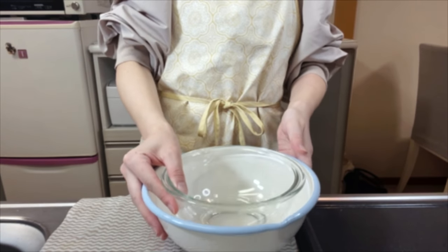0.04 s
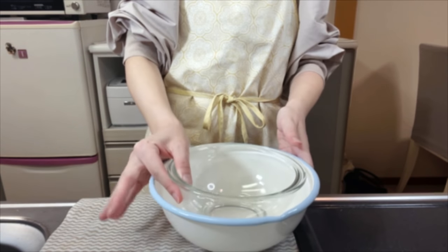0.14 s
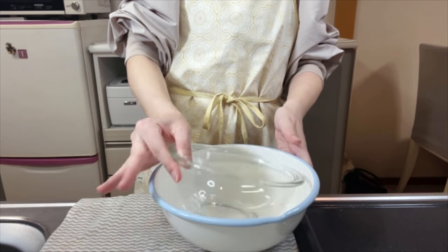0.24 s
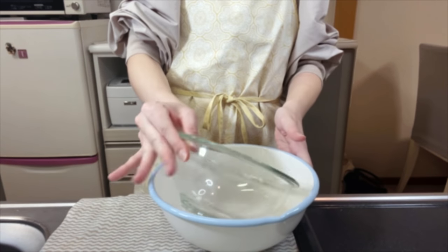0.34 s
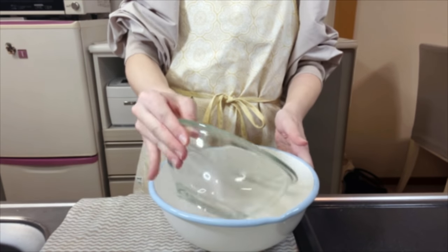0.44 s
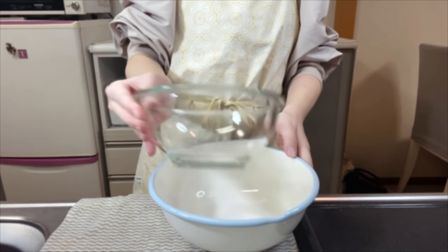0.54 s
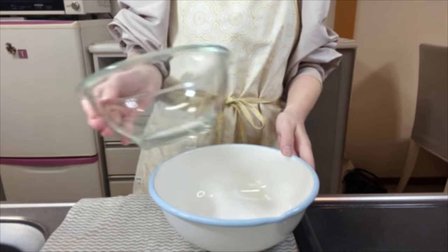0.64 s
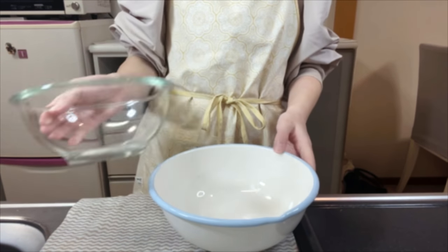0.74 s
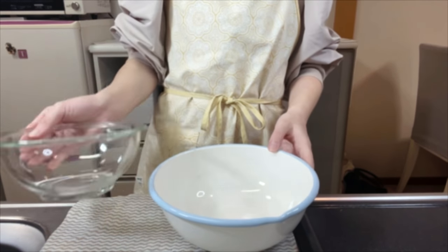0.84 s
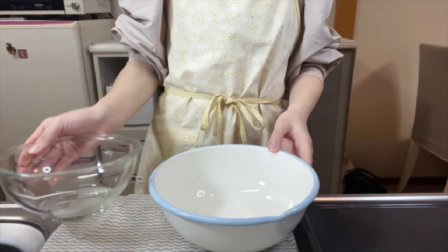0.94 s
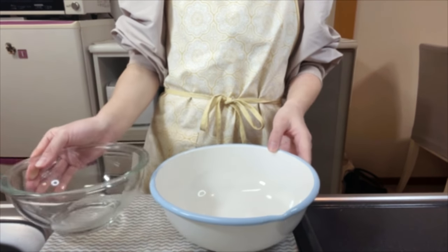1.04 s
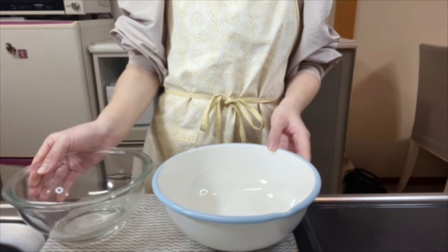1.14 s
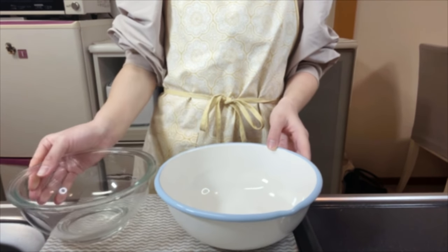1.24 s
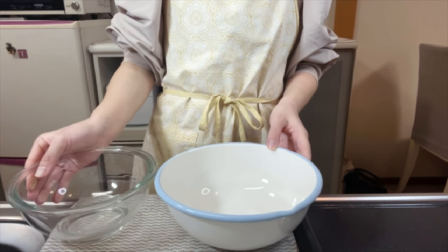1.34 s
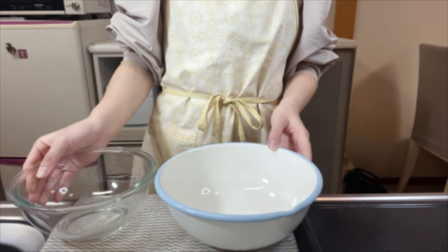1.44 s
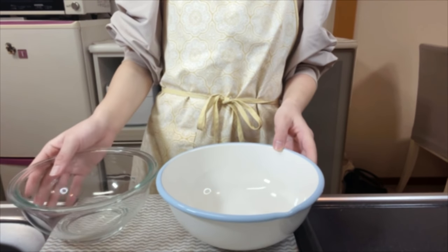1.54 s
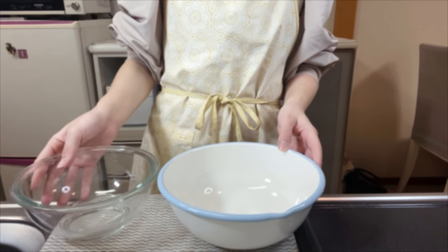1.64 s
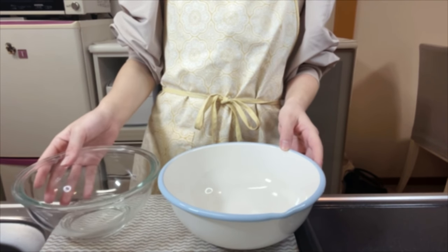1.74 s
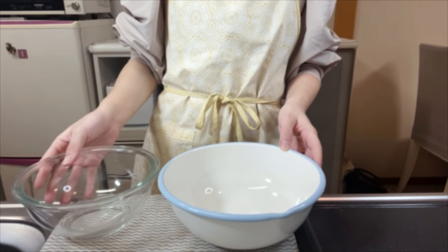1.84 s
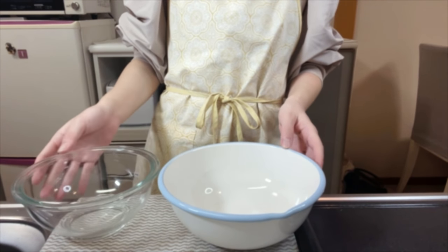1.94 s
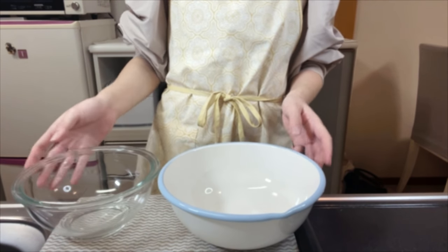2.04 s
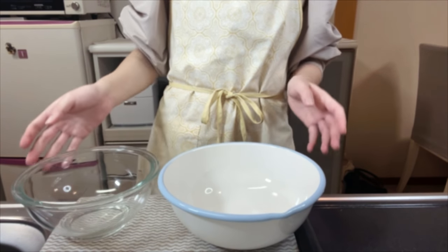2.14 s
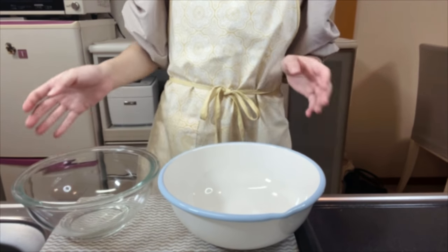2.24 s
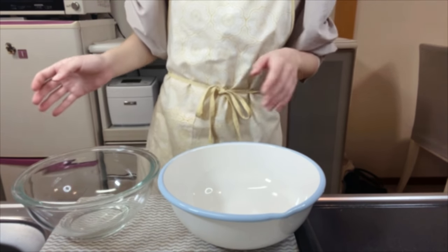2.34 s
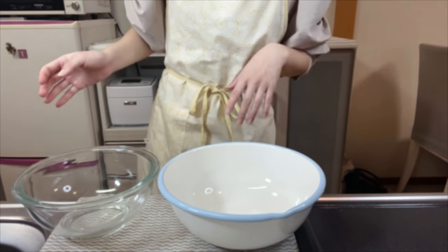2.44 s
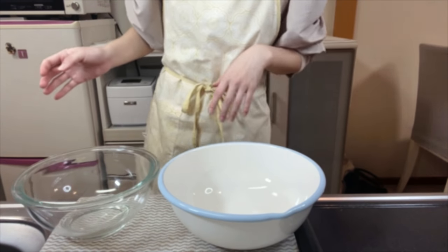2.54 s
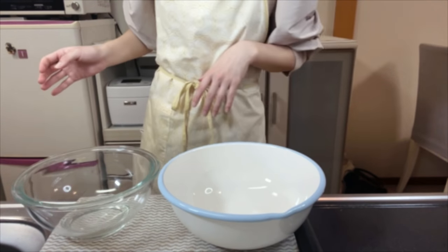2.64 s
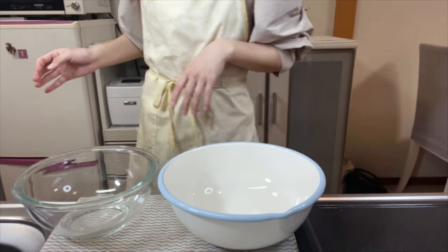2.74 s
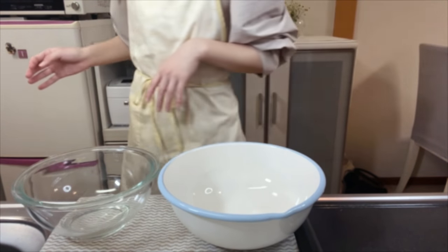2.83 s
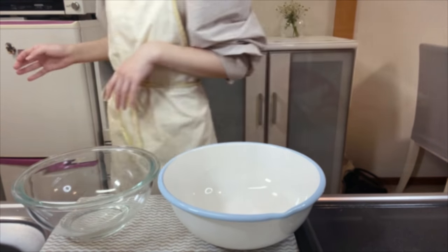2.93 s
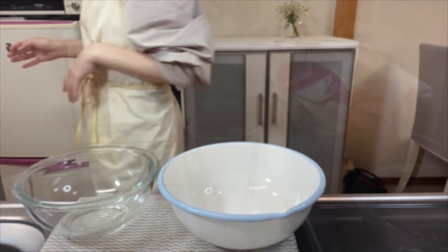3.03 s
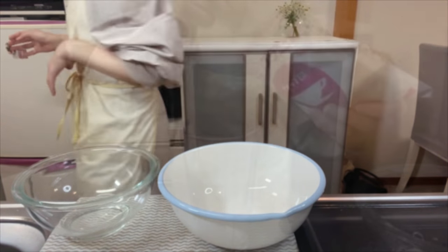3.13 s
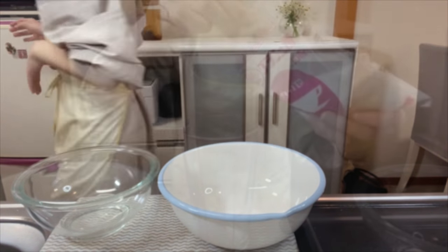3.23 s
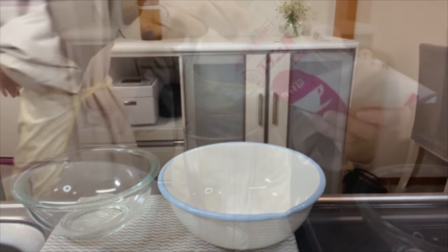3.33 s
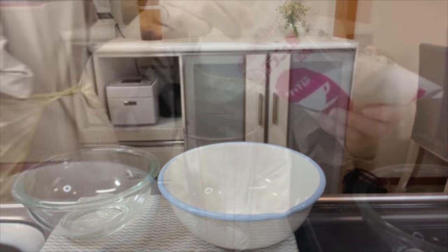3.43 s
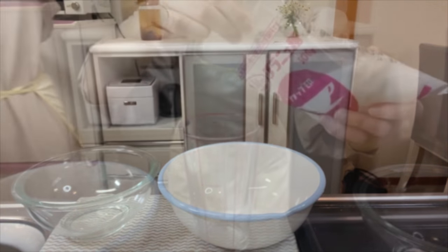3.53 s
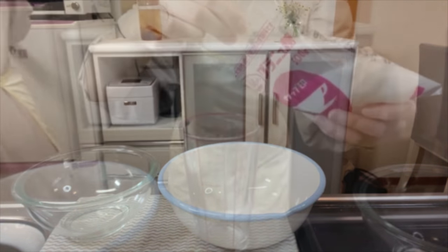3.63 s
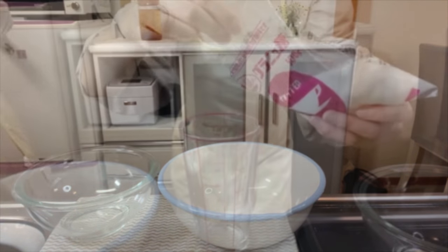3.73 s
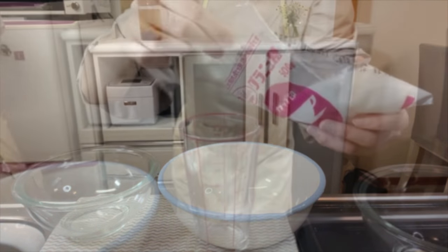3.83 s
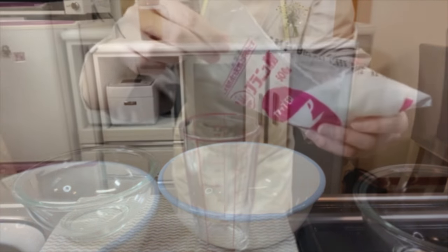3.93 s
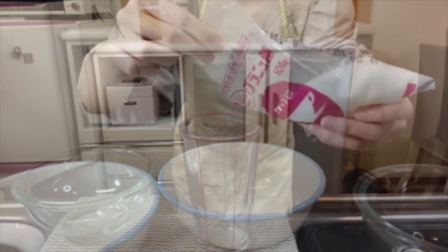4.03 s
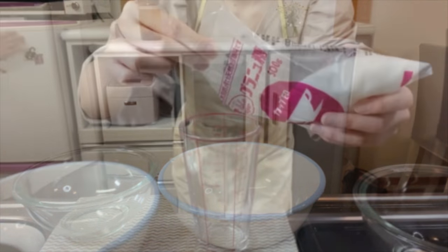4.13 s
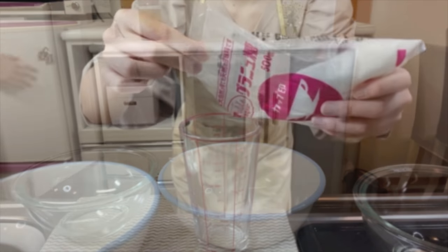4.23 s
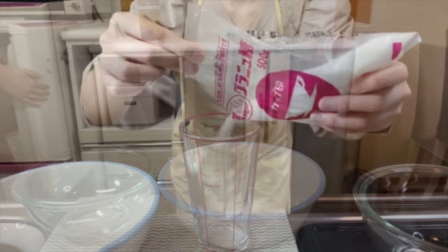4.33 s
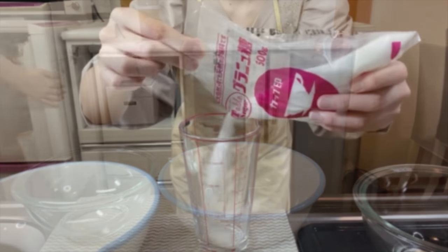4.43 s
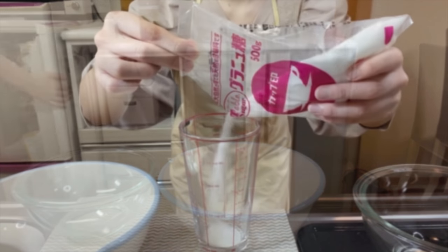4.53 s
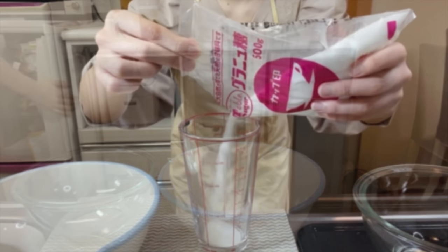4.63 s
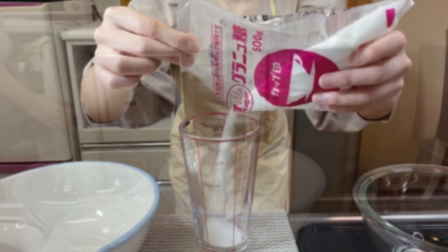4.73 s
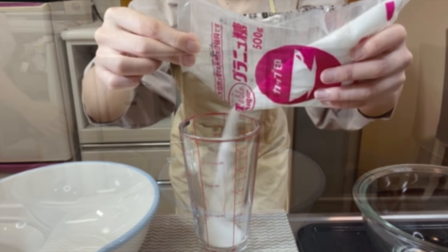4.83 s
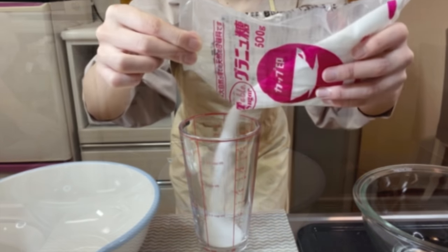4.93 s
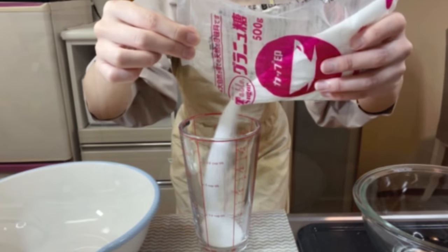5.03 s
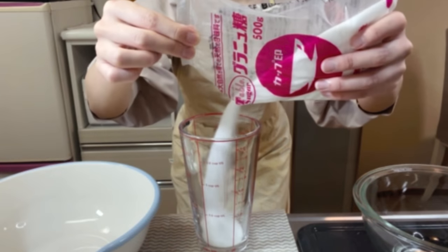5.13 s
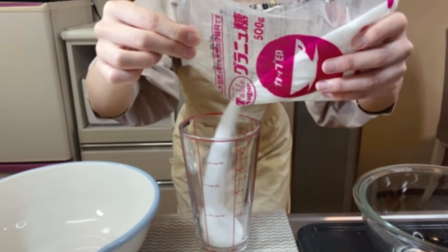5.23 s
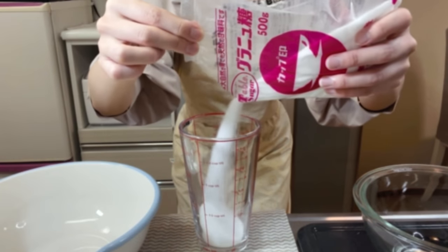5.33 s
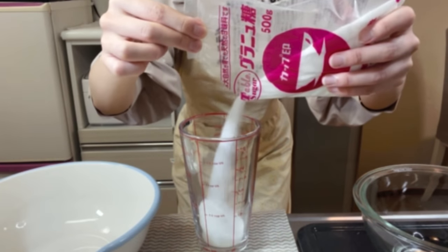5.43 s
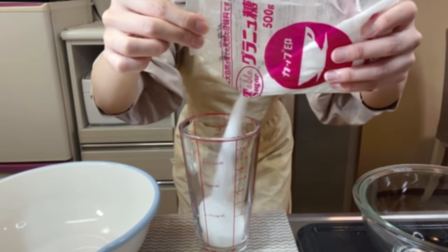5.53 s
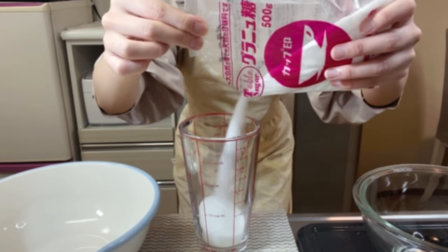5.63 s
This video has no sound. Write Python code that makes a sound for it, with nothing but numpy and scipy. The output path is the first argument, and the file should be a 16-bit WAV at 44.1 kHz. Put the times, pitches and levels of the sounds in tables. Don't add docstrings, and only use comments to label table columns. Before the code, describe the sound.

A glass bowl scrapes and squeaks out of a bigger bowl, clinks down three times, then sugar hisses from a crackling bag into a tall glass.

```python
import sys
import numpy as np
from scipy import signal
from scipy.fft import rfft, irfft, next_fast_len
from scipy.io import wavfile
from scipy.ndimage import uniform_filter1d

SR = 44100
rng = np.random.default_rng(int(sys.argv[2]) if len(sys.argv) > 2 else 0)


def elevation(decibels):
    levels = np.asarray(decibels, float)
    return 10 ** (levels / 20)


def master(y):
    cut = np.clip(np.atleast_2d(y).T, -1, 1)
    pcm = np.round(cut * 32767)
    wavfile.write(sys.argv[1], SR, pcm.astype(np.int16))


N = 250047


def evened(x):
    return x / np.sqrt(np.mean(x ** 2) + 1e-20)


def read(points, hz, column=1):
    table = np.array(points, float)
    return np.interp(np.log(hz + 1), np.log(table[:, 0] + 1), table[:, column])


def follow(rows, fade=0.033):
    s, *columns = np.transpose(rows)
    t = np.arange(N) / SR
    curves = [np.interp(t, s, column) for column in columns]
    gate = np.clip(np.minimum(t - s[0], s[-1] + fade - t) / fade, 0, 1)
    return curves, gate


def add(mix, s, sound):
    part = mix[:, round(s * SR):][:, :sound.shape[1]]
    part += sound[:, :part.shape[1]]


def colour(x, points):
    size = next_fast_len(x.shape[1])
    gain = elevation(read(points, np.fft.rfftfreq(size, 1 / SR)))
    return evened(irfft(rfft(x, size) * gain, size)[:, :x.shape[1]])


def resonate(x, hz, width):
    r = np.exp(-np.pi * width / SR)
    return evened(signal.lfilter([1, 0, -1], [1, -2 * r * np.cos(2 * np.pi * hz / SR), r * r], x))


def wander(seconds):
    size = max(int(seconds * SR), 1)
    smooth = uniform_filter1d(rng.standard_normal(N), size)
    return evened(uniform_filter1d(smooth, size))


def hiss(points, lumpy_db, seconds):
    return colour(rng.standard_normal((2, N)), points) * elevation(lumpy_db * wander(seconds))


# time in seconds, pressure in dB.
PRESSURE = [(.04, -91.5), (.054, -50.5), (.116, -63.5), (.121, -48.5), (.162, -65), (.25, -46),
            (.324, -39.5), (.38, -78.5), (.44, -100.5)]
# pitch in Hz, width in Hz.
SQUEAKS = [(745, 210), (1375, 150), (2290, 130)]
# frequency in Hz, level in dB.
GRIT_COLOUR = [(300, 7), (1000, 4.5), (3300, 6.5), (6500, -12.5), (9000, 3), (12000, -9), (16000, -12)]
# pitch in Hz, level in dB, time to fade 60 dB in seconds, lead of the right port in radians,
# left over right in dB.
LIFT_RING = [(1340, -40.0, 0.09, 3.1, 1), (2078, -37.5, 1.04, 0.0, 4), (2142, -45.0, 1.03, -2.8, -8),
             (2151, -38.0, 0.18, 2.9, -5), (2959, -39.0, 0.18, 0.8, -4), (2966, -50.0, 0.52, 2.0, 9),
             (3004, -54.0, 0.73, -2.4, -6), (4243, -56.0, 0.46, -1.1, 6), (4263, -44.0, 0.12, -0.9, 1),
             (4280, -56.0, 0.38, -1.1, 3), (4802, -47.0, 0.22, 2.9, -2), (4859, -48.0, 0.28, 1.4, 4),
             (5447, -47.0, 0.11, 0.7, 8), (5458, -59.0, 0.29, 0.0, 4), (6266, -51.0, 0.34, -2.9, -11),
             (6590, -51.0, 0.27, 0.7, -6)]
NESTED_RING = [(864, -41, 0.04, 0.23, 0), (1300, -42, 0.037, 0.59, 0), (1676, -43, 0.03, 0.37, 0),
               (2368, -53, 0.1, 1.4, 0), (3010, -59, 0.16, 0.52, 0), (3270, -52, 0.055, 1.6, 0),
               (3360, -44.5, 0.075, 2.16, 0)]


def drag():
    (press_db,), gate = follow(PRESSURE)
    slips = rng.standard_normal((2, N)) * elevation(2.0 * wander(.003))
    full_db = -37
    squeak_db = [-45.5, -37.5, -41.5]
    slope = [0.51, 1.34, 0.91]
    tones = 0
    for db, k, (hz, width) in zip(squeak_db, slope, SQUEAKS):
        squeak = evened(resonate(resonate(slips, hz, width), hz, width))
        tones = tones + elevation(db + k * (press_db - full_db)) * squeak
    rim_modes = list(LIFT_RING[3::2]) + list(NESTED_RING[3:])
    rim = sum(resonate(slips, hz, 50) for hz, *_ in rim_modes)
    tones += elevation(press_db - 18.5) * rim
    ticks = uniform_filter1d(rng.exponential(1, N) ** 3, 30) / 6
    slips *= elevation(2.6 * np.minimum(ticks, 4))
    grit = colour(slips, GRIT_COLOUR)
    dull = signal.lfilter(*signal.butter(2, 4000, fs=SR), grit)
    bite_s = .119
    grit = np.where(np.arange(N) < bite_s * SR, dull, grit)
    return gate * (tones + elevation(press_db - 1.0) * grit)


# frequency in Hz, level in dB.
CLATTER_COLOUR = [(200, -0.5), (700, -7.5), (1300, 4), (2500, -4.5), (4500, -7), (8000, -11), (12000, -6),
                  (16000, -25)]
# frequency in Hz, level in dB.
LINGER_COLOUR = [(1500, -8.5), (3700, 3), (7000, -5), (12000, -20.5)]
CROWD_HZ = np.sort(rng.uniform(1250, 14500, 60))


def clink(modes, db, build, clatter_db, t60, hold):
    t = np.arange(int(.9 * SR)) / SR
    phase = rng.uniform(0, 2 * np.pi, len(modes))
    free = np.maximum(t - hold, 0)
    side = np.array([[.5], [-.5]])
    ring = 0
    for (hz, d, decay, lead, pan_db), p in zip(modes, phase):
        swing = np.sin(2 * np.pi * hz * t + p + np.array([[0], [lead]]))
        ring = ring + elevation(d + side * pan_db - 60 * free / decay) * swing
    grip_db = -40 * (t / t[-1]) ** 6
    tone = elevation(db + grip_db) * ring * (1 - np.exp(-t / build))

    short = t[:SR // 2]
    weight, start = rng.standard_normal((2, 2, len(CROWD_HZ)))
    turn = 2 * np.pi * CROWD_HZ[:, None] * short
    crowd = evened(weight @ np.sin(turn) + start @ np.cos(turn))
    fade_db = -60 * short / t60
    clatter = colour(rng.standard_normal(crowd.shape), CLATTER_COLOUR) * elevation(clatter_db + fade_db)
    clatter += colour(crowd, CLATTER_COLOUR) * elevation(clatter_db - 9.5 + fade_db)
    clatter += colour(crowd, LINGER_COLOUR) * elevation(clatter_db - 15.5 + fade_db / 1.8)
    clatter *= 1 - np.exp(-short / (.5 * build))
    add(tone, 0, 0.66 * clatter[::-1])
    return tone, clatter


def knock(db, hz, t60, rise, grit_db):
    t = np.arange(int(.2 * SR)) / SR
    shape = (1 - np.exp(-t / rise)) ** 2
    grit = colour(rng.standard_normal((2, len(t))), GRIT_COLOUR) * elevation(grit_db - 60 * t / (t60 + 0.032))
    blip = elevation(db + 9.5 - 60 * t / t60) * np.sin(2 * np.pi * hz * t)
    return shape * np.ones((2, 1)) * blip, shape * grit


def snap(db, hz, rattle_db, edge):
    t = np.arange(int(.15 * SR)) / SR
    turn = 2 * np.pi * (hz * t + 2.78 * (1 - np.exp(-t / 0.0002)))
    spiky = np.sin(turn) - edge * (np.cos(2 * turn) + 0.65 * np.sin(3 * turn))
    pop = elevation(db) * spiky * np.exp(-((t - .0013) / 0.00046) ** 2)
    rattle = colour(rng.standard_normal((2, len(t))), CLATTER_COLOUR) * elevation(rattle_db - 60 * t / 0.045)
    return np.ones((2, 1)) * pop, rattle


def shuffle(db, t60, treble_db):
    t = np.arange(SR // 2) / SR
    spectrum = [(150, 9.5), (450, 8.0), (1200, -5.5), (3000, -2.0),
                (8000, treble_db - 3.5), (12000, treble_db - 5.5), (16000, treble_db - 15.0)]
    brush = colour(rng.standard_normal((2, len(t))), spectrum)
    return brush * elevation(db + 9.5 - 60 * t / t60) * (1 - np.exp(-t / (0.02 * t60)))


def thump(db, hz):
    t = np.arange(SR // 2) / SR
    swing = np.sin(2 * np.pi * hz * t) + 0.36 * np.sin(2 * np.pi * 1.8 * hz * t)
    return np.ones((2, 1)) * swing * elevation(db + 4.5 - 60 * t / 0.12) * (1 - np.exp(-t * hz / 1.3))


# start in seconds, pitch in Hz, level in dB,
# time to fade 60 dB in seconds, beats per second.
FREE_BOWL = (1.69, 1196, -53.5, 4.4, 1.45)


def sing_on():
    s, hz, db, t60, beats = FREE_BOWL
    t = np.arange(2 * SR) / SR
    pair = 1 + .5 * np.cos(2 * np.pi * beats * t)
    return s, np.ones((2, 1)) * pair * elevation(db - 60 * t / t60) * np.sin(2 * np.pi * hz * t)


FIRST_RING = [(1133, -31.0, 0.08, -2.2, -3), (1159, -20.0, 0.09, -1.9, -3), (1178, -26.0, 0.1, -2.3, 5),
              (2083, -24.5, 0.26, 0.0, 3), (2156, -27.0, 0.15, 2.6, 2), (2178, -38.0, 0.32, 2.0, 10),
              (2977, -33.0, 0.14, -0.9, -12), (3024, -31.0, 0.16, 1.4, -1), (3054, -33.0, 0.18, 0.9, -12),
              (3673, -25.0, 0.11, -2.8, 1), (3698, -40.0, 0.17, -2.8, -3), (3721, -38.0, 0.24, 2.0, 0),
              (4241, -28.0, 0.2, -2.1, -2), (4261, -32.0, 0.08, 2.0, 10), (4807, -43.0, 0.18, -2.6, 9),
              (4868, -53.0, 0.27, -0.3, 2), (4883, -44.0, 0.24, -0.2, 2), (5387, -42.0, 0.12, 1.9, -2),
              (5422, -43.0, 0.13, -2.3, -8), (5456, -45.0, 0.19, 2.4, 2), (6076, -50.0, 0.24, 0.2, 2),
              (6208, -53.0, 0.28, 2.8, 2), (6302, -39.0, 0.1, -1.3, 6), (6616, -35.0, 0.09, 0.0, 1),
              (6676, -41.0, 0.17, 2.4, 4), (7264, -50.0, 0.18, -0.4, -12), (8249, -40.0, 0.09, -1.5, -5),
              (8259, -35.0, 0.11, -1.6, -6), (10024, -40.0, 0.13, 2.8, 0), (10051, -43.0, 0.14, 2.5, 4)]
SECOND_RING = [(717, -51.0, 0.5, 0.1, 1), (734, -45.0, 0.26, -1.3, -2), (1212, -33.0, 0.12, 0.0, -3),
               (1309, -33.0, 0.13, -0.1, 2), (1342, -30.0, 0.17, 0.1, 3), (1379, -39.0, 0.12, -0.2, 1),
               (1517, -38.0, 0.17, -0.1, -1), (1547, -34.0, 0.08, -0.3, -1), (2084, -46.0, 0.38, 0.3, 5),
               (2171, -33.0, 0.15, 1.1, 12), (2193, -45.0, 0.16, 2.6, 6), (3010, -40.0, 0.22, 0.5, -4),
               (3054, -33.0, 0.19, -2.3, -10), (3096, -32.0, 0.08, 0.3, 3), (3686, -47.0, 0.35, -2.9, 4),
               (3709, -29.0, 0.13, 2.2, 1), (3731, -35.0, 0.13, 2.3, 6), (4236, -49.0, 0.35, -1.9, -1),
               (4253, -52.0, 0.41, -1.7, 0), (4312, -48.0, 0.15, -0.1, -4), (4861, -49.0, 0.29, -1.2, 9),
               (4906, -43.0, 0.21, 0.6, 8), (5387, -53.0, 0.17, 1.4, 10), (5430, -55.0, 0.23, 1.8, -1),
               (5449, -50.0, 0.11, 2.0, 12), (6237, -51.0, 0.16, 2.9, -1), (6665, -52.0, 0.08, 1.3, 12),
               (6689, -45.0, 0.15, -0.6, 7), (6717, -57.0, 0.17, -0.5, 9), (8256, -43.0, 0.1, -1.5, 1)]
THIRD_RING = [(1190, -35.0, 0.26, 0.3, 3), (1232, -33.0, 0.11, -0.4, 0), (1553, -34.0, 0.08, 0.2, 1),
              (2075, -57.0, 0.85, 0.2, 0), (2144, -39.0, 0.41, 2.0, 10), (2185, -31.0, 0.11, 0.1, 7),
              (2327, -32.0, 0.08, -2.7, 1), (2955, -29.0, 0.09, 1.3, 11), (2998, -38.0, 0.38, -0.5, 0),
              (3002, -30.0, 0.11, -0.9, -1), (3025, -39.0, 0.23, -0.3, 0), (3671, -34.0, 0.24, 2.7, -4),
              (3688, -33.0, 0.37, 2.4, -2), (3716, -36.0, 0.28, 2.2, -1), (4239, -34.0, 0.3, -2.3, -4),
              (4278, -36.0, 0.3, 0.9, -8), (4311, -28.0, 0.09, -0.0, -2), (4792, -41.0, 0.28, 0.4, -6),
              (4839, -36.0, 0.11, 0.7, -5), (4899, -32.0, 0.08, 0.9, -2), (5389, -39.0, 0.14, 2.5, -10),
              (5421, -38.0, 0.15, -2.5, -3), (5452, -37.0, 0.29, 1.3, 1), (6052, -41.0, 0.22, 2.3, 5),
              (6062, -39.0, 0.23, 1.8, -2), (6080, -49.0, 0.24, -0.4, 10), (6283, -52.0, 0.19, -2.1, -2),
              (6289, -56.0, 0.51, -2.6, 3), (6620, -39.0, 0.12, -1.3, -4), (6651, -40.0, 0.2, -1.9, 6),
              (6668, -49.0, 0.26, -2.6, 6), (7181, -56.0, 0.25, -2.4, 12), (7214, -42.0, 0.11, 0.9, 12),
              (7240, -46.0, 0.13, 2.4, 12), (8395, -37.0, 0.11, -2.2, -12)]
FURTHER_RINGS = [
    [(382, -50, .9, 1.8, 0), (404, -49, .9, -.9, 0), (1195, -61, 1.3, -1.5, 0), (1136, -60, .7, 0, 0)],
    [(404, -42, .18, -2, 0), (556, -43, .27, -1.7, -3), (880, -34, .16, 0, -3), (1690, -38, .15, 0, 0)],
    [(514, -49, .74, -2.5, -3), (1120, -55, 1.33, 3.4, 0), (4030, -44, .11, 0, 0), (2850, -51, .4, -1.5, 0)],
    [(412, -45, .6, -1.4, 3), (750, -44, .1, -1.7, -3)],
]
# start in seconds, ring in dB, build-up in seconds, clatter in dB,
# clatter's time to fade 60 dB in seconds, seconds that chatter keeps feeding the ring.
BOWL_CLINKS = [
    (.322, 1.36, 0.0086, -39, 0.089, 0.0033),
    (1.253, 1.84, 0.0054, -24, .13, 0.016),
    (1.418, -1.8, 0.0064, -28.5, 0.11, 0.034),
    (1.679, -0.5, 0.01, -25, 0.13, 0.026),
]
NESTED_NUDGES = [
    (0.053, -1.5, 0.0012, -74, 0.034, 0.0033),
    (0.095, 1.5, 0.00068, -65, 0.016, 0.0012),
    (0.1185, -2.5, 0.0009, -52, 0.03, 0.0014),
]
# start in seconds, peak in dB, pitch in Hz, time to fade 60 dB in seconds.
RIM_SLIPS = [(.17, -41, 2250, 0.052), (.186, -33, 743, 0.14), (.2, -29, 704, 0.052),
             (.194, -32.5, 349, 0.084), (.232, -27.5, 1462, 0.053), (.25, -31.5, 570, 0.061),
             (0.254, -17, 1400, 0.035), (0.267, -12, 1358, 0.027), (.27, -23, 710, 0.044),
             (.282, -24.5, 2196, 0.048), (.287, -23.5, 2990, 0.03), (0.281, 0.5, 1450, 0.016),
             (.305, -27.5, 1395, 0.072), (.3135, -6, 1360, 0.03), (.31, -27.5, 583, 0.043),
             (.32, -20, 428, 0.034), (0.334, -26, 1430, 0.014), (3.411, -40.5, 490, 0.075),
             (1.388, -50.5, 1400, 0.074), (1.4185, -15, 3015, 0.046), (1.434, -22.5, 1270, 0.077),
             (1.488, -35, 733, 0.05), (1.491, -36, 304, 0.075), (1.535, -45, 736, 0.072),
             (1.684, -23.5, 2166, 0.13), (4.025, -24, 769, 0.029)]
HARD_TAPS = [(0.122, -55, 6080, 0.044), (.324, -12, 2130, 0.0048), (1.25, -39, 1440, 0.02),
             (1.254, -25, 2990, 0.046), (1.257, -15, 1300, 0.016), (1.26, -35.5, 759, 0.081),
             (1.274, -27.5, 1190, 0.031), (1.419, -27, 1540, 0.012), (1.43, -22.5, 1640, 0.011),
             (1.439, -14, 1640, 0.0096), (1.263, -29.5, 2194, 0.03), (1.687, -25.5, 3070, 0.032),
             (1.691, -29.5, 4110, 0.044), (1.695, -34, 1540, 0.014), (1.708, -32.5, 1300, 0.013),
             (0.056, -76, 8500, 0.032), (0.093, -76, 8500, 0.026), (.257, -44, 2960, 0.015),
             (4.258, -37.5, 540, 0.029), (4.352, -30.5, 713, 0.016), (1.678, -14.5, 1460, 0.012),
             (1.682, -35.5, 2136, 0.12), (1.42, -39, 4900, 0.088), (1.688, -24, 1300, 0.018),
             (3.879, -44, 930, 0.015), (4.032, -44, 684, 0.03)]
# start in seconds, level in dB, pitch in Hz, rattle in dB, edge as a share.
BAG_SNAPS = [
    (4.258, -12.5, 1480, -26.5, 0.54),
    (4.3525, -12, 1378, -23, 0.45),
]
# start in seconds, level in dB, time to fade 60 dB in seconds, treble in dB.
BRUSHES = [(1.49, -51.5, 0.29, -16), (2.351, -56.5, 0.21, -12), (2.889, -61.5, 0.081, -13.5),
           (2.973, -70, 0.3, 4), (3.346, -50, 0.054, -11), (3.39, -61, 0.37, 1), (3.504, -44, 0.14, -15.5),
           (3.655, -47.5, 0.25, -23.5), (3.745, -55.5, 0.091, -31)]
# start in seconds, peak in dB, pitch in Hz.
BLOWS = [(0.289, -39, 229), (0.311, -35.5, 103.6), (0.331, -39.5, 250), (0.342, -34, 159),
         (1.135, -28.5, 106), (1.1427, -17, 88.2), (1.154, -38, 93), (1.26, -26, 161.5), (1.416, -21.5, 86),
         (1.587, -39, 67), (1.682, -29, 75), (2.345, -42, 112), (2.935, -41.5, 92), (3.349, -29, 71.4),
         (3.431, -27, 72), (3.515, -39, 252), (3.545, -41, 233), (3.661, -38, 146), (3.684, -42, 105.5),
         (3.755, -42.5, 270.5), (3.803, -50, 104), (3.839, -33.5, 101.4), (4.042, -33, 90),
         (5.515, -33.5, 106.4)]


def contacts():
    tones, noises = np.zeros((2, N)), drag()
    hits = []
    rings = (LIFT_RING, FIRST_RING, SECOND_RING, THIRD_RING)
    for modes, further, (s, *how) in zip(rings, FURTHER_RINGS, BOWL_CLINKS):
        hits.append((s, clink(list(modes) + list(further), *how)))
    for s, *how in NESTED_NUDGES:
        hits.append((s, clink(NESTED_RING, *how)))
    for s, db, hz, t60 in RIM_SLIPS:
        hits.append((s, knock(db, hz, t60, rise=0.0095, grit_db=db - 42.5)))
    for s, db, hz, t60 in HARD_TAPS:
        hits.append((s, knock(db, hz, t60, rise=0.00097, grit_db=db - 9.5)))
    for s, *how in BAG_SNAPS:
        hits.append((s, snap(*how)))
    for s, (tone, noise) in hits:
        add(tones, s, tone)
        add(noises, s, noise)
    for s, *how in BRUSHES:
        add(noises, s, shuffle(*how))
    for s, *how in BLOWS:
        add(tones, s, thump(*how))
    add(tones, *sing_on())
    return tones, noises


# time in seconds, flow in dB.
FLOW = [(3.78, -69.5), (4.03, -61), (4.1, -49), (4.206, -35.5), (4.27, -36.5), (4.36, -38.5), (4.48, -50),
        (4.7, -46), (4.95, -39.5), (5.2, -40.5), (5.6, -46.5), (5.67, -43.5)]
# frequency in Hz, level in dB.
GRAIN_COLOUR = [(500, -7.5), (1200, -6.5), (2000, -7.5), (2900, -4), (4700, -5), (6500, -3.5), (9000, -3.5),
                (10500, -2.5), (13000, -8), (16000, -4)]
# pitch in Hz, width in Hz, level in dB.
TALL_GLASS = [(1795, 680, -16), (2783, 120, -19), (3370, 360, -13), (4340, 150, -14), (5470, 160, -20.5)]


def sugar():
    (flow_db,), gate = follow(FLOW, 0.032)
    body_db = -6 + 0.36 * (flow_db - flow_db.max())
    buried = (1 + np.tanh((np.arange(N) / SR - 4.3) / 0.14)) / 2
    sing_db = flow_db - 8 - 18 * buried
    sizes_db = 2.0 * np.minimum(rng.exponential(1, N), 4)
    grains = rng.standard_normal((2, N)) * elevation(sizes_db) * (rng.random(N) < .45)
    grains = grains * elevation(2.0 * np.tanh(wander(0.0041)))
    glass = sum(elevation(db) * resonate(grains, hz, width) for hz, width, db in TALL_GLASS)
    stream = colour(grains, GRAIN_COLOUR) + glass
    low = signal.lfilter([.35], [1, -.65], stream)
    hissing = elevation(flow_db + 9.0) * (low * elevation(body_db + 1.0) + (stream - low)) / np.std(stream)
    top = signal.lfilter(*signal.butter(2, 9000, "high", fs=SR), hissing)
    hissing -= top * (1 - elevation(np.minimum(flow_db + 56, 0)))
    bare = resonate(grains, 6690, 180)
    bare = bare + .5 * (resonate(grains, 4650, 140) + resonate(grains, 6240, 140))
    return gate * (hissing + elevation(sing_db - 4.5) * bare)


# time in seconds, lift in
# dB.
BACKGROUND_LIFT = [(0, 2.5), (.3, -1.5), (3.34, 1), (3.37, 5.5), (3.8, 7.5), (4.2, 16), (5.67, 16)]
# centre in seconds, level in dB, half length in seconds.
CLOTH_SWEEPS = [(0.237, -51, 0.07), (0.626, -68, 0.13), (1.252, -51.5, 0.0073), (1.67, -56.5, 0.0055),
                (2.193, -68, 0.14), (2.6, -75, 0.027), (0.442, -70.5, 0.048), (2.971, -66, 0.072),
                (3.404, -66.5, 0.15), (3.684, -73.5, 0.14), (4.264, -47, 0.022)]
# frequency in Hz, level in dB.
RUMBLE_COLOUR = [(12, -78), (20, -22), (70, 2), (107, 4), (122, -1), (141, -10), (172, -1.5), (216, -20.5),
                 (240, -23), (310, -40.5), (530, -120)]
MURMUR_COLOUR = [(88, -32.5), (150, -8), (177, -8), (231, -3), (405, 0), (572, -9), (735, -6), (909, -12),
                 (1500, -21), (1950, -28), (3300, -120)]
CLOTH_COLOUR = [(500, 6.5), (1200, -2.5), (2500, 4), (5000, -4.5), (8000, -14), (12000, -16), (16000, -20)]


def kitchen():
    (stir_db,), _ = follow(BACKGROUND_LIFT)
    t = np.arange(N) / SR
    second = t[:SR]
    wake_db, wake_t60 = np.c_[[-16, -29.5]], np.c_[[0.44, 1]]
    wakes = np.zeros((2, N))
    for s, db, _ in BLOWS:
        wake = elevation(db + wake_db - 60 * second / wake_t60) * (1 - np.exp(-second / 0.011))
        add(wakes, s, wake)
    sweeps = sum(elevation(db + 7.0) * np.exp(-((t - s) / half) ** 2) for s, db, half in CLOTH_SWEEPS)
    rumble = (elevation(-60.5 + stir_db) + wakes[0]) * hiss(RUMBLE_COLOUR, 0.91, .03)
    murmur = hiss(MURMUR_COLOUR, 1.5, .02)
    dull = signal.lfilter(*signal.butter(3, 340, fs=SR), murmur)
    murmur = elevation(-63.5 + stir_db) * murmur + wakes[1] * dull
    cloth = (elevation(-80 + 0.35 * stir_db) + sweeps) * hiss(CLOTH_COLOUR, 0.82, 0.0044)
    return rumble + murmur + cloth


# frequency in Hz, time to fade 60 dB in seconds.
ROOM_FADE = [(100, .25), (1000, .17), (5000, .15), (15000, .11)]


def walls(x):
    taps = np.zeros((2, SR // 2))
    at = np.arange(200, SR // 2 - 20, 20)
    at = at + rng.integers(0, 20, (2, len(at)))
    np.put_along_axis(taps, at, rng.choice([-1., 1.], at.shape), 1)
    hz, t, z = signal.stft(taps, SR, nperseg=256)
    fade = elevation(-60 * t / read(ROOM_FADE, hz)[:, None])
    tail = signal.istft(z * fade, SR, nperseg=256)[1]
    return signal.fftconvolve(x, tail / np.linalg.norm(tail[0]), axes=1)[:, :N]


# frequency in Hz, likeness from 0 to 1, lead of the right in radians.
TWO_PORTS = [(60, .85, 0), (400, .65, .1), (800, .15, .3), (1500, .65, .8), (2500, .5, 2.1),
             (3700, .65, 3.1), (5500, .55, 4.2), (7100, .6, 6.4), (8300, .5, 4.2), (9850, .995, 3.14),
             (11200, .8, 1.7), (12800, .99, 0), (14300, .72, -1.5), (15900, .99, -3.14)]


def ports(x):
    size = next_fast_len(N + 4096)
    hz = np.fft.rfftfreq(size, 1 / SR)
    left, other = rfft(x, size)
    same = np.clip(read(TWO_PORTS, hz), 0, 1)
    turn = np.exp(1j * read(TWO_PORTS, hz, column=2))
    right = same * turn * left + np.sqrt(1 - same ** 2) * other
    return irfft(np.array([left, right]), size)[:, :N]


def self_noise():
    spectrum = [(500, -7), (2000, 6.5), (6000, -7), (16000, -16)]  # Hz, dB
    return elevation(-76) * colour(rng.standard_normal((2, N)), spectrum)


def scene():
    tones, noises = contacts()
    echoes = walls(elevation(-10.5) * tones + elevation(-5.5) * noises)
    scattered = noises + echoes + kitchen() + sugar()
    return tones + ports(scattered) + self_noise()


def top_cut(x):
    return signal.sosfilt(signal.butter(12, 16480, fs=SR, output="sos"), x)


def record(dry):
    return top_cut(dry)


dry = scene()
out = record(dry)
master(out)
```